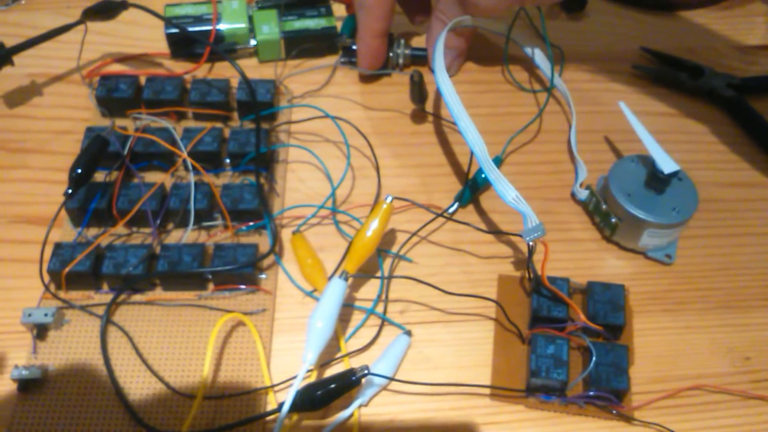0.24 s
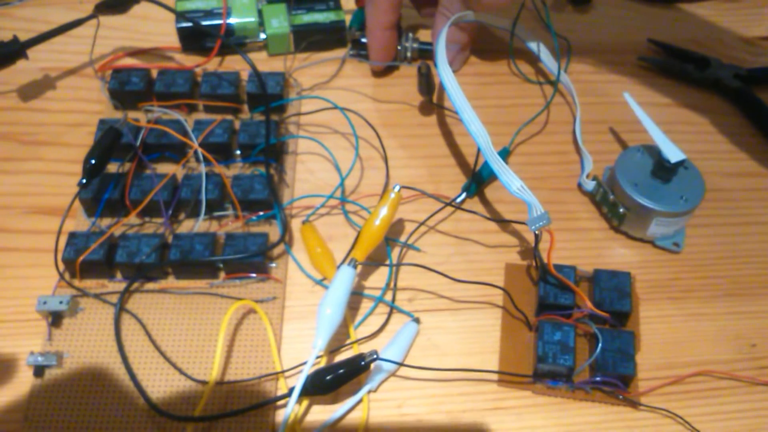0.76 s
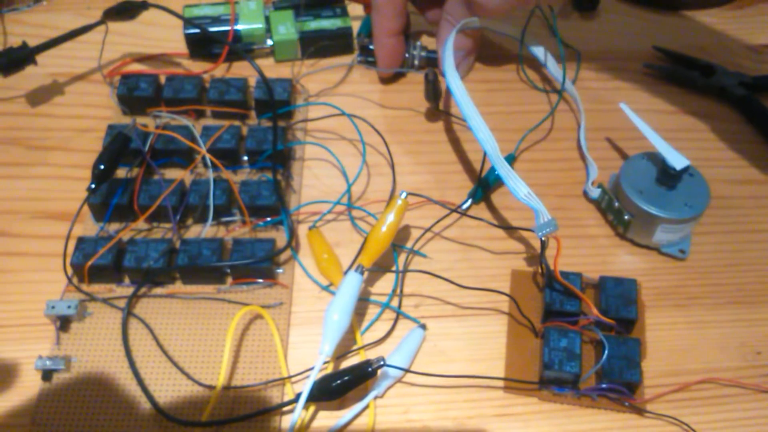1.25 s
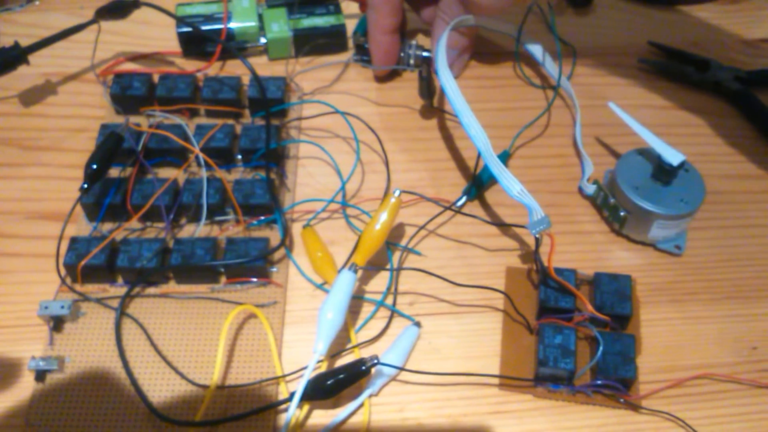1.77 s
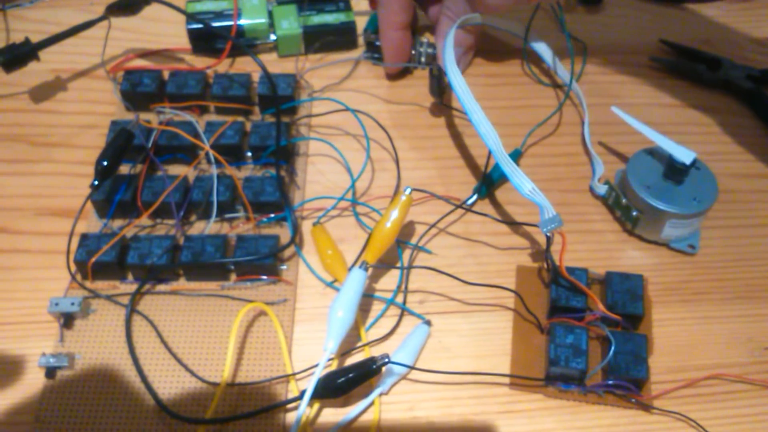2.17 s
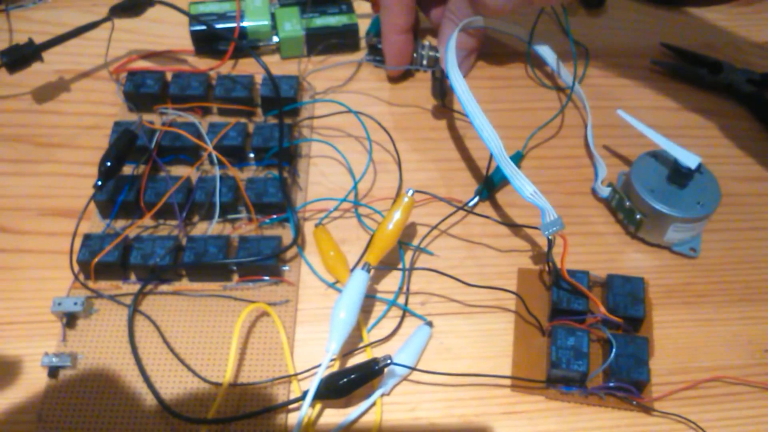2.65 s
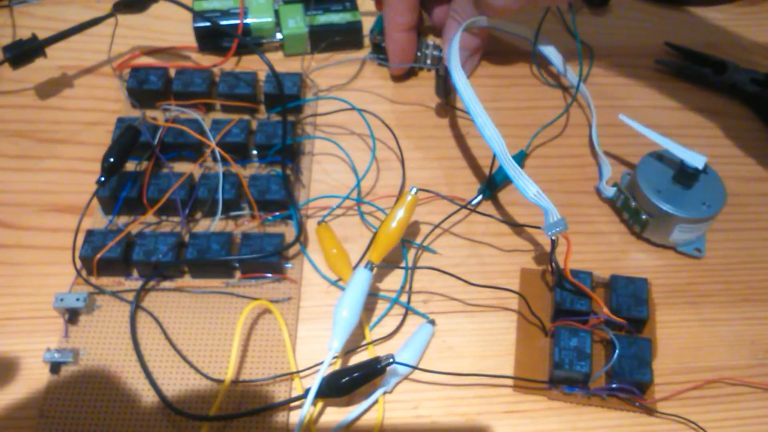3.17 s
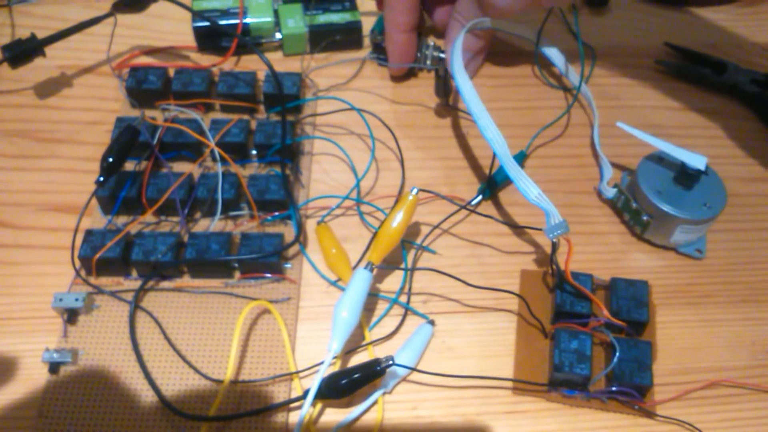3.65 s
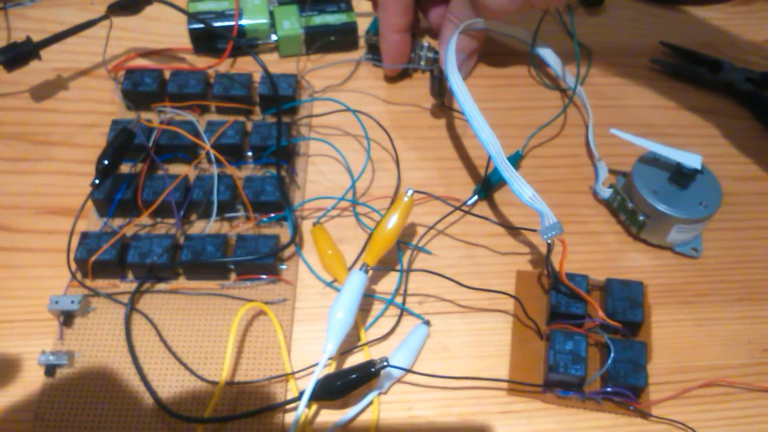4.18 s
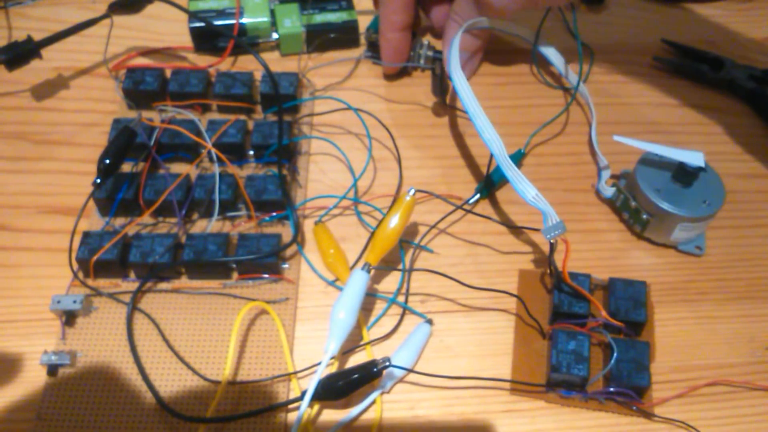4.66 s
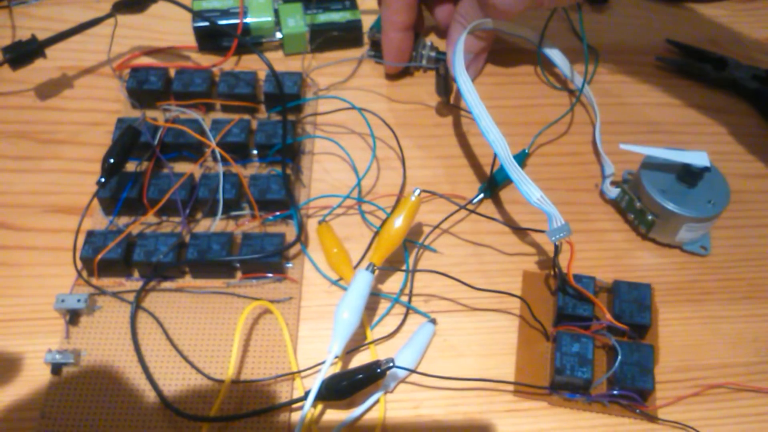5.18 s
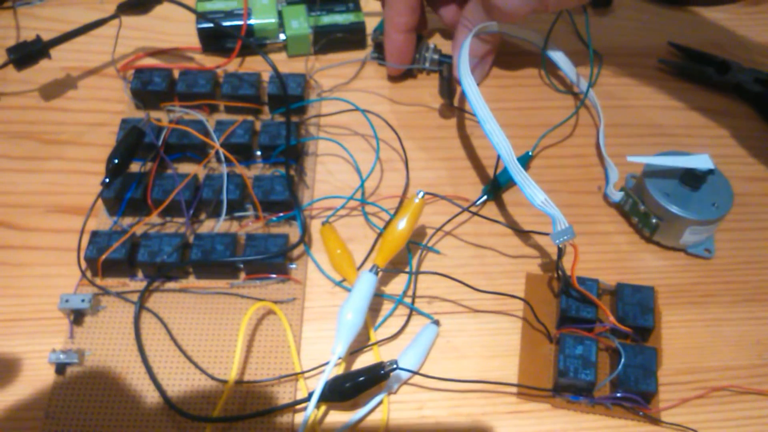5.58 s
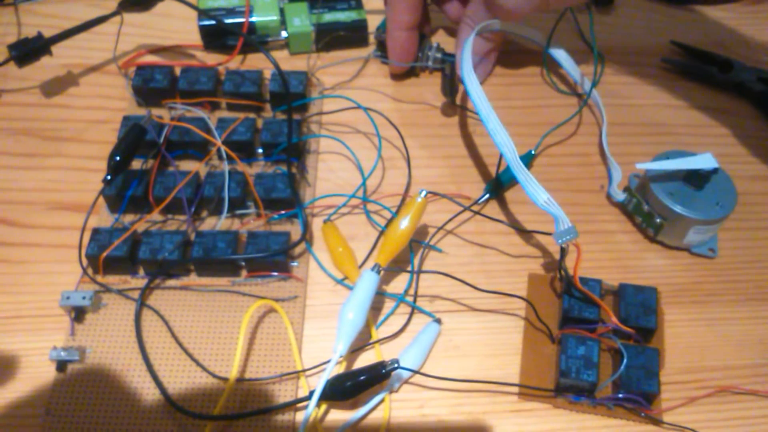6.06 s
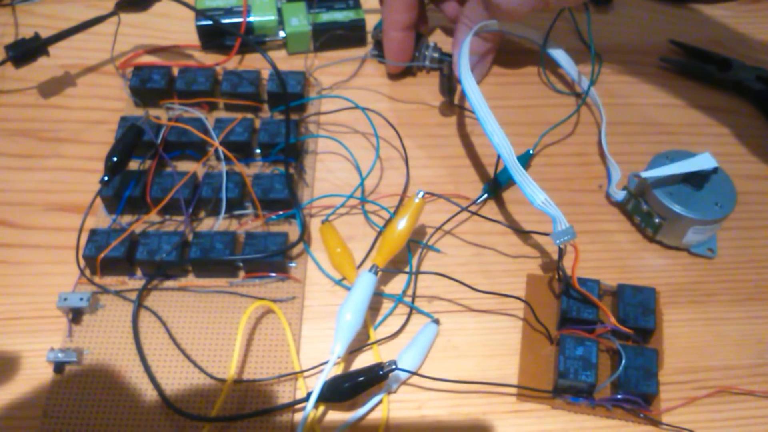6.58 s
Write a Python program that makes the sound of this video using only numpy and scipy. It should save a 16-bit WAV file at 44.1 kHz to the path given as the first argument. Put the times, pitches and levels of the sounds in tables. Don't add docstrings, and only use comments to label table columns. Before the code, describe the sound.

Relays on a perforated board chatter in quick, sharp clusters: a louder pull-in, then about an eighth of a second later a usually softer drop-out whose clicks often grow. The pairs repeat at a nearly steady pace from one second on. High metal ringing, a tiny squeal and a brief wooden thud accompany them, with small motor ticks between. Low room rumble and hiss stay underneath; the sound is near, with a short room tail.

```python
import sys
import numpy as np
from scipy import signal
from scipy.fft import rfft, irfft, next_fast_len
from scipy.io import wavfile
from scipy.ndimage import uniform_filter1d

SR = 44100
rng = np.random.default_rng(int(sys.argv[2]) if len(sys.argv) > 2 else 0)


def level_to_linear(level):
    exponent = np.asarray(level, float) / 20
    return 10 ** exponent


def transcribe(signal):
    frames = np.atleast_2d(signal).T
    limited = np.clip(frames, -1, 1)
    pcm = np.round(limited * 32767).astype(np.int16)
    wavfile.write(sys.argv[1], SR, pcm)


N = 301203


def along(points, hz):
    f, v = np.transpose(points)
    return np.interp(np.log(hz + 1), np.log(f + 1), v)


def filtered(x, response):
    m = next_fast_len(len(x) + 8192)
    spectrum = rfft(x, m) * response(np.fft.rfftfreq(m, 1 / SR))
    return irfft(spectrum, m)[:len(x)]


def add(track, s, sound):
    part = track[round(s * SR):][:len(sound)]
    part += sound[:len(part)]


def ring(modes, t, scatter_db, detune, rise, rough=0):
    hz, db, t60 = np.transpose(modes)[:, :, None]
    luck = rng.standard_normal((3, len(modes), 1))
    wobble = uniform_filter1d(rng.standard_normal((len(modes), len(t))), size=40)
    waver = wobble.cumsum(1) * rough * hz / SR
    phase = 2 * np.pi * (hz * (1 + detune * luck[0]) * t + luck[1]) + waver
    decay = level_to_linear(db + scatter_db * luck[2] - 60 * t / t60)
    return (decay * np.sin(phase)).sum(0) * (1 - np.exp(-t / rise))


def level(x, count):
    return x / np.sqrt(2 * np.mean(x[:count] ** 2))


# frequency in Hz, t60 in s.
ROOM_DECAY = [(200, 0.78), (600, 0.28), (1600, 0.55), (2450, 0.3), (3100, 0.26), (5000, .33), (8200, 0.3),
              (11000, 0.25), (16000, 0.22)]


def echo(colour_db, gap):
    hz, t = np.fft.rfftfreq(256, 1 / SR), np.arange(120) * 128 / SR
    z = rng.standard_normal((len(hz), 2 * len(t))).view(complex) / 12
    decay = level_to_linear(colour_db(hz)[:, None] - 60 * t / along(ROOM_DECAY, hz)[:, None])
    tail = signal.istft(z * decay, SR, nperseg=256)[1]
    return tail * np.tanh(np.arange(len(tail)) / SR / gap) ** 2


# frequency in Hz, level in dB per Hz.
HISS_COLOUR = [(18, -43), (30, -4), (59, 11.5), (108, 4.5), (148, 1.5), (264, -5.5), (508, -8), (549, -7.5),
               (610, -9), (1790, -14), (2040, -13.5), (15700, -19)]


def hiss():
    noise = filtered(rng.standard_normal(N), lambda hz: level_to_linear(along(HISS_COLOUR, hz)))
    return level_to_linear(-61) * noise / noise.std()


# start in seconds, peak in dB, pitch in Hz.
BUMPS = [(.2, -58.5, 840), (.968, -65, 605), (1.459, -55.5, 560), (1.525, -58, 582), (2.083, -55.5, 579),
         (2.635, -58, 484), (2.922, -62, 580), (3.163, -56, 584), (3.628, -58, 891), (3.67, -53, 810),
         (3.984, -51.5, 293), (4.191, -57, 458), (4.496, -51, 330), (4.708, -52, 574), (4.997, -47, 323),
         (5.246, -57, 560), (5.535, -45, 300), (5.744, -59.5, 398), (5.772, -55.5, 586), (6.026, -46, 320),
         (6.261, -59, 888), (6.55, -60, 892), (6.781, -53, 570)]
# frequency in Hz, t60 in s.
BUMP_DECAY = [(300, 0.13), (580, 0.11), (880, 0.092)]


def bumps():
    out, t = np.zeros(N), np.arange(SR // 6) / SR
    for s, db, hz in BUMPS:
        envelope = level_to_linear(db + 18 - 60 * t / along(BUMP_DECAY, hz)) * np.tanh(t / 0.0032)
        rub = rng.standard_normal(len(t)) * envelope
        add(out, s, filtered(rub, lambda f: (.8j * f * hz / (hz * hz - f * f + .8j * f * hz)) ** 2))
    return out


# start in seconds, peak in dB, dulling in Hz, thump in dB.
SNAPS = [
    (0.574, -43, 2580, -47),
    (2.4256, -39, 11300, -69.5),
]


def snaps():
    out, t = np.zeros(N), np.arange(SR // 6) / SR
    bench = [(71.5, 0, 0.134), (152.4, 1, 0.028), (261, -5.5, 0.023), (330, -8.5, 0.016)]  # Hz, dB, t60 s
    for s, db, dull_hz, thump_db in SNAPS:
        burst = rng.standard_normal(len(t)) * level_to_linear(db - 60 * t / 0.01)
        crack = filtered(burst, lambda f: 1 / (1 + 1j * f / dull_hz) ** 2)
        thump = ring(bench, t, 0.92, detune=0.01, rise=0.00026)
        add(out, s, crack + level_to_linear(thump_db) * thump)
    return out


# start in seconds, blade strength in dB,
# bench peak in dB, share thrown to the walls in dB.
BURSTS = [(1.025, -0.5, -35, -17), (1.166, 0, -31.5, -12.5), (1.5752, -1, -34, -13),
          (1.7136, -2, -33.5, -14.5), (2.131, 0.5, -31.5, -16.5), (2.2512, -0.5, -30, -15),
          (2.6859, 0.5, -31.5, -14.5), (2.8086, -0.5, -33, -14.5), (3.2045, -1, -35.5, -15.5),
          (3.3195, 0, -32, -12.5), (3.7122, -0.5, -34, -14), (3.8408, -1, -30.5, -16.5),
          (4.2248, 1, -32.5, -16.5), (4.3458, 1, -30, -17), (4.7495, 1, -30.5, -16.5),
          (4.8746, -1.5, -32.5, -13.5), (5.2917, -0.3, -34, -18), (5.42, 1, -31, -13),
          (5.8122, -1.5, -33.5, -11.5), (5.9264, -1.5, -30, -15.5), (6.309, 0.5, -32.5, -18),
          (6.4316, 0, -30, -14), (6.8194, 0, -31, -4)]
# delay in s, blade peak in dB, blade pitch in Hz, case and sizzle in dB over the blade.
PULL_IN = [
    [(0, -12, 8520, -6.5, -6.5), (.0032, -6, 8215, -12.5, -11.5), (.0065, -9.5, 7970, -9.5, -8.5),
     (.0097, -25.5, 8410, -3.5, -8)],
    [(0, -9.5, 8390, -10, -9), (.0036, -13.5, 7550, -1.5, -9.5), (.007, -17.5, 8200, -5, -4.5),
     (.0105, -21.5, 8350, -4, -13)],
    [(0, -8.5, 8295, -17.5, -20), (.0036, -17.5, 7890, -3.5, -4.5), (.0076, -24, 8000, 3, -1)],
    [(0, -9, 8270, -11, -16), (.0035, -19.5, 7800, -1, -6), (.0067, -23, 8570, -17, -0.5),
     (.012, -20, 7920, -2.5, -6)],
]
DROP_OUT = [
    [(0, -29, 8000, -17.5, 0), (.004, -22, 7780, 0.5, -2.5), (.0096, -15.5, 8304, -7, -4.5)],
    [(0, -26.5, 7600, -3, -1.5), (.0038, -16.5, 8520, -5.5, -16.5), (.0068, -28, 8060, -5.5, -7.5),
     (.013, -23, 8040, -4, -6)],
    [(0, -18, 8350, -9.5, -5), (.0046, -26.5, 8540, 5, -6.5), (.01, -12.5, 8250, -6.5, -5)],
    [(0, -20.5, 7750, -8, -5.5), (.0036, -23, 8400, 0, -12), (.006, -18.5, 8670, -8.5, -20),
     (.009, -38, 8130, -24, 2), (.0123, -36, 8000, 6.5, -15.5)],
]
PULL_HOLD_S = [0.0017, 0.0026, 0.0027, 0.0032]
DROP_HOLD_S = [.0032, 0.0029, 0.0029, 0.0031]
# frequency in Hz, level in dB per Hz.
SIDEWAYS = [
    [(1590, -64), (2480, -32.5), (2950, -19), (4330, -13), (4560, -11.5), (4910, -5), (5700, -9.5),
     (6800, -4.5), (8180, -5), (9490, -17.5), (11700, -9), (13100, -15), (15100, -12.5), (15800, -23.5)],
    [(1590, -28.5), (2700, -14), (3940, -9.5), (4300, -5), (5610, -8.5), (6090, 0), (6800, -5.5),
     (8120, -5), (8430, -12), (8810, -15), (9490, -15), (11200, -7.5), (13500, -19.5), (15800, -8.5)],
]


def contacts():
    for k, (s, strength_db, _, thrown_db) in enumerate(BURSTS):
        released, state = k % 2, k // 2 % len(PULL_IN)
        hold = (PULL_HOLD_S, DROP_HOLD_S)[released][state]
        for late, db, hz, case_db, sizzle_db in (PULL_IN, DROP_OUT)[released][state]:
            yield s + late, db + strength_db, hz, hold, case_db, sizzle_db, thrown_db, SIDEWAYS[released]


# frequency in Hz, level in dB, t60 in s.
CASE = [(3315, -11.5, 0.0087), (4114, -1, 0.0091), (4520, -12, 0.024), (4983, -4, 0.021),
        (5710, -13.5, 0.017), (6450, -10, 0.013), (7443, -5, 0.027)]
# frequency in Hz, level in dB, t60 in s.
SIZZLE = [(9240, -1, 0.0077), (10210, -11, 0.034), (11270, -7, 0.017), (13640, 1.5, 0.0078),
          (14000, -9, 0.0027), (15600, 2.5, 0.0042)]


def relays():
    out, scattered, t = np.zeros(N), np.zeros(N), np.arange(SR // 36) / SR
    approach = level_to_linear(-44 - 60 * t[::-1] / .012)
    for s, db, hz, hold, case_db, sizzle_db, thrown_db, sideways in contacts():
        clamp = np.sqrt((1 - np.exp(-(t / .0003) ** 2)) * np.exp(-(t / hold) ** 3))
        chatter = uniform_filter1d(rng.standard_normal(len(t)), size=24)
        loose = np.interp(db, [-24, -10], [1.8, .6])
        after = level_to_linear(-28 - 60 * t / 0.049) * np.tanh(t / hold)
        song = np.sin(2 * np.pi * (hz * t + rng.random()))
        blade = (clamp * (1 + loose * chatter) + after) * song

        sung = round(hold * SR)
        case = level(ring(CASE, t, 0.49, detune=0.0057, rise=0.00021, rough=1), count=sung)
        scrape = np.diff(rng.standard_normal(len(t) + 1)) * clamp
        sizzle = level(ring(SIZZLE, t, 2.3, detune=0.016, rise=0.00021) + 0.5 * scrape, count=sung)
        strike = blade + level_to_linear(case_db + 0.53) * case + level_to_linear(sizzle_db + 1.5) * sizzle
        add(out, s, level_to_linear(db - 0.8) * strike)

        travel = 0.92 * np.sin(2 * np.pi * hz * t) + .5 * rng.standard_normal(len(t))
        add(out, s - len(t) / SR, approach * travel)

        thrown = level_to_linear(db + thrown_db) * np.sqrt(hold * 400)
        add(scattered, s, thrown * echo(lambda f: along(sideways, f), gap=0.0013))
    return out, scattered


FRAME_DB = [-28, -31.5, -35, -23.5]
SQUEAL_DB = [-23.5, -15.5, -27, -21]


def squeals():
    out, t = np.zeros(N), np.arange(SR // 8) / SR
    squeal_hz, half_length_s = 15550, 0.0014
    frames = [(5020, 0, 0.11), (4950, -3, 0.11), (4140, -7, .06)]  # Hz, dB, t60 s
    for k, (s, strength_db, _, _) in enumerate(BURSTS[::2]):
        state = k % len(PULL_IN)
        swell = level_to_linear(SQUEAL_DB[state] + strength_db) * np.exp(-(t / half_length_s - 2) ** 2)
        squeal = swell * ring([(squeal_hz, 0, 1)], t, 0.98, .004, .0001, rough=1.3)
        add(out, s + PULL_IN[state][1][0] - .002, squeal)
        frame_ring = ring(frames, t, 1, 0.0026, 0.0034, rough=1.217)
        add(out, s, level_to_linear(FRAME_DB[state] + strength_db) * frame_ring)
    return out


# frequency in Hz, level in dB, t60 in s.
BENCH = [(135.4, -13, 0.07), (253.5, -21, 0.0075), (335.5, 1, 0.077), (384.7, -0.5, 0.075),
         (454.3, -10.5, 0.21), (548.2, -10.5, 0.22), (632, -10.5, 0.2), (706, -19, 0.068),
         (819.7, -4, 0.069), (925, -18, 0.48)]
# frequency in Hz, level in dB, t60 in s.
BOARD = [(997.4, -12, 0.18), (1080, -18.5, 0.029), (1400, -22.5, .03), (1627, 1, 0.086), (1719, -2, 0.16),
         (1808, -11, 0.02), (2117, -2.5, 0.065), (2484, -18, 0.0067)]
PULL_BOARD_DB = [-37, -35.5, -35.5, -37]
DROP_BOARD_DB = [-35.5, -38, -34.5, -37.5]


def board_and_bench():
    out, t = np.zeros(N), np.arange(SR // 9) / SR
    shoves_s = 0.02
    for k, (s, _, bench_db, _) in enumerate(BURSTS):
        board_db = (PULL_BOARD_DB, DROP_BOARD_DB)[k % 2][k // 2 % len(PULL_IN)]
        for late in (0, .3, .6, 1):
            bench = ring(BENCH, t, 0.56, detune=0.02, rise=0.0034, rough=6.5)
            board = ring(BOARD, t, 1.7, detune=0.0044, rise=0.0023, rough=3.26)
            shove = level_to_linear(bench_db - 6.5 - 10.9 * late) * bench + level_to_linear(board_db - 3.5 - 17 * late) * board
            add(out, s + 0.0013 + late * shoves_s, shove)
    return out


# start in seconds, peak in dB.
TICKS = [(1.3063, -50), (1.839, -45), (2.3228, -42.5), (2.3784, -49), (2.944, -49), (3.3944, -47),
         (3.4544, -50.5), (3.901, -42), (3.953, -44), (4.464, -43.5), (4.694, -45.5), (4.938, -41),
         (4.9825, -44), (5.538, -48), (5.987, -44), (6.0546, -50), (6.2537, -48.5), (6.493, -37),
         (6.551, -41)]


def ticks():
    out, t = np.zeros(N), np.arange(SR // 6) / SR
    modes = [(3180, 0, .007), (3800, -7, .005), (2500, -10, .005),
             (1050, -9, .012), (1750, -5.5, .012)]
    for s, db in TICKS:
        add(out, s, level_to_linear(db + 4) * ring(modes, t, 1.4, .02, .0006, rough=3.6))
    return out


def room(x):
    out, hop = np.zeros(N), SR // 6
    for start in range(0, N, hop):
        tail = echo(np.zeros_like, gap=.003)
        add(out, start / SR, signal.fftconvolve(x[start:start + hop], tail / np.linalg.norm(tail)))
    return out


def scene():
    strikes, scattered = relays()
    near = strikes + squeals() + board_and_bench() + bumps() + snaps() + ticks()
    return (near + level_to_linear(-14.0) * room(near) + scattered + hiss())[None]


def low_pass(x):
    return signal.sosfilt(signal.butter(12, 17140, fs=SR, output="sos"), x)


# centre in seconds, half width in s, depth in dB.
DROPOUTS = [
    (.879, 0.011, -16),
    (2.019, 0.0042, -7),
    (2.621, 0.0048, -3),
    (3.061, .005, -5),
]


def record(dry):
    t = np.arange(N) / SR
    top_hz, bass_hz, leak_db = 15900, 45, -50.5
    dip_db = sum(db * np.exp(-((t - s) / half) ** 4) for s, half, db in DROPOUTS)

    def band(hz):
        treble = 1 / (1 + (hz / top_hz) ** 150) + level_to_linear(leak_db)
        return treble * hz ** 2 / (hz ** 2 + bass_hz ** 2)

    return low_pass(filtered(dry[0] * level_to_linear(dip_db), band)[None])


dry = scene()
out = record(dry)
transcribe(out)
```